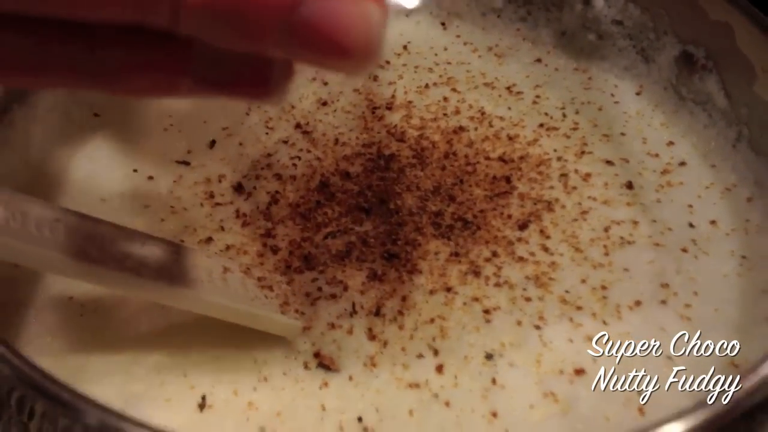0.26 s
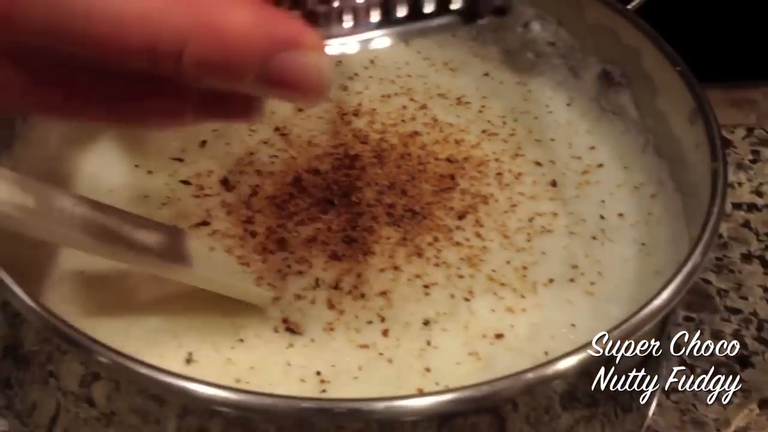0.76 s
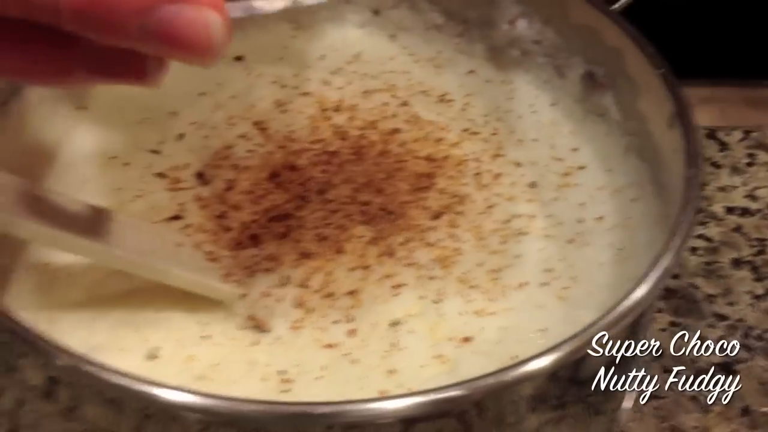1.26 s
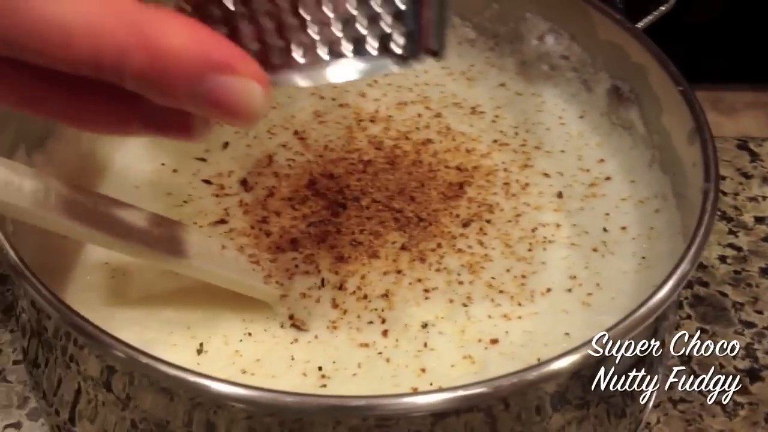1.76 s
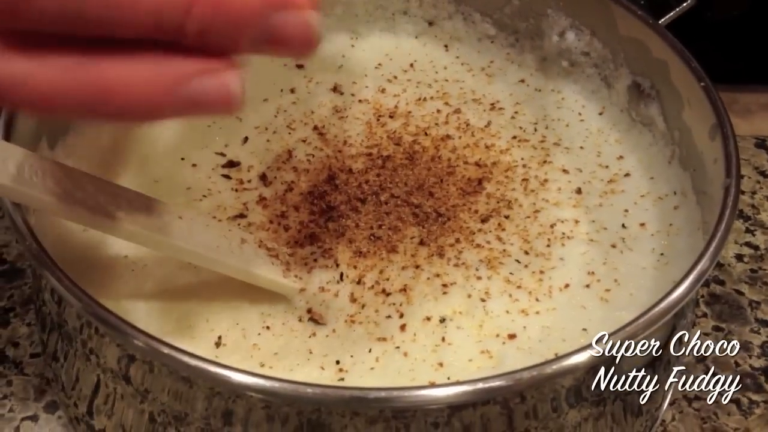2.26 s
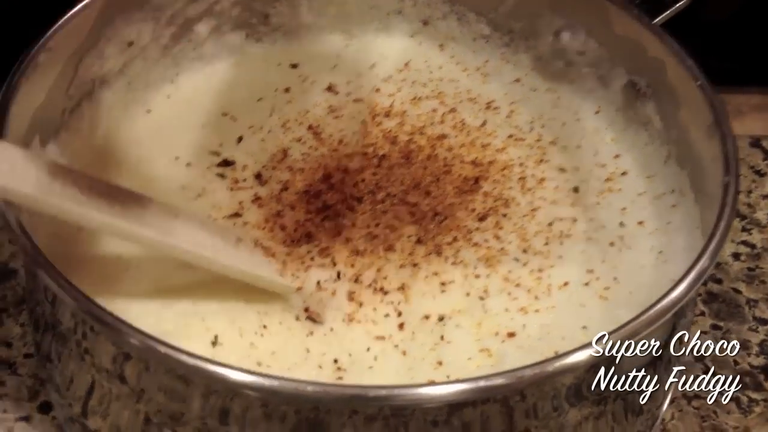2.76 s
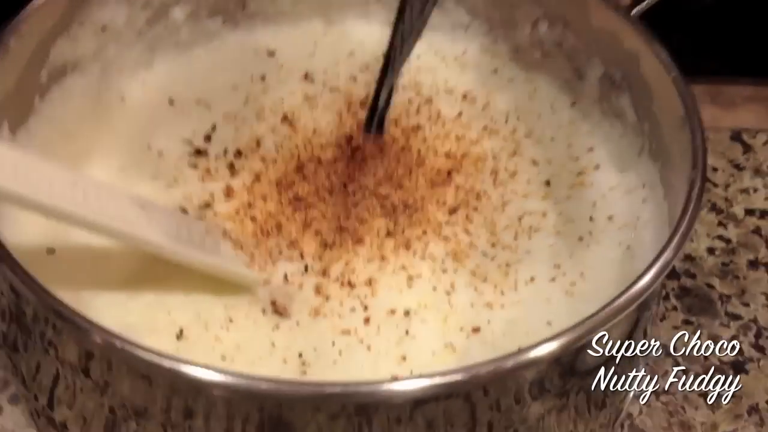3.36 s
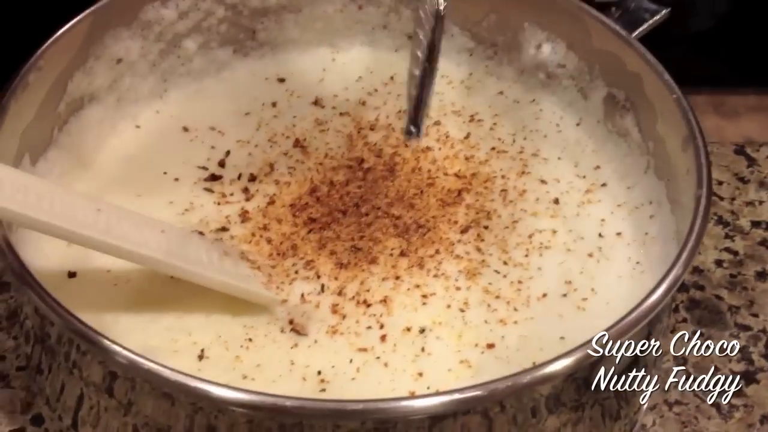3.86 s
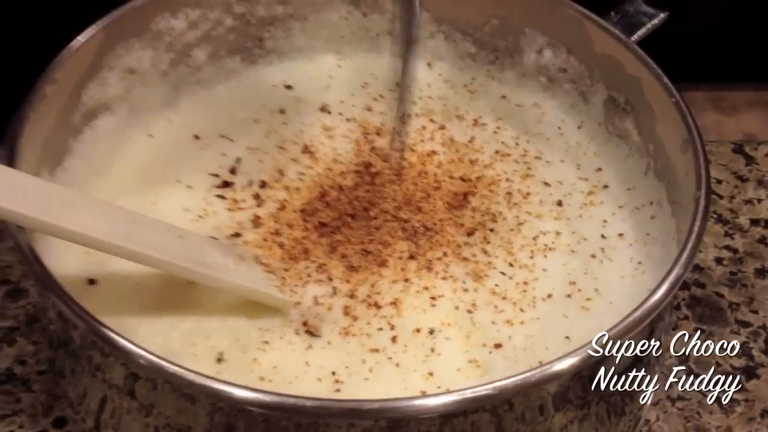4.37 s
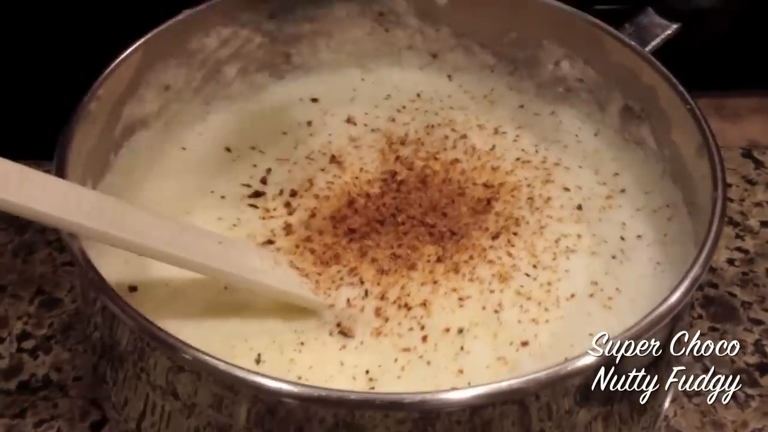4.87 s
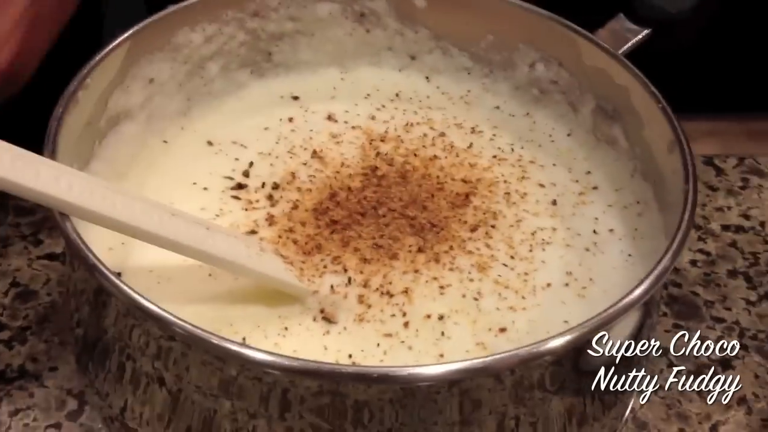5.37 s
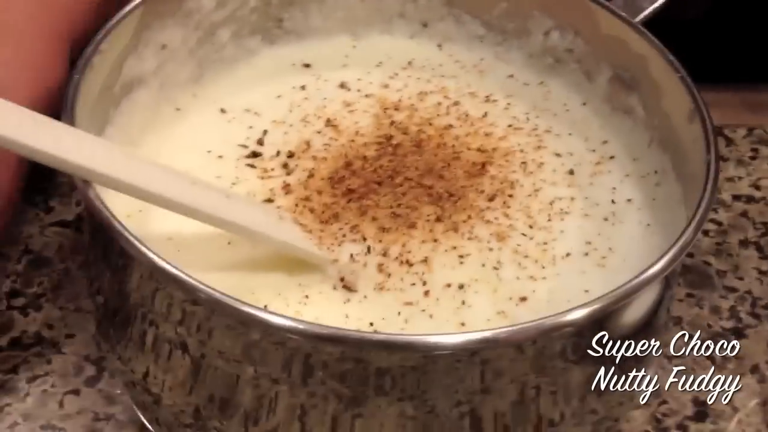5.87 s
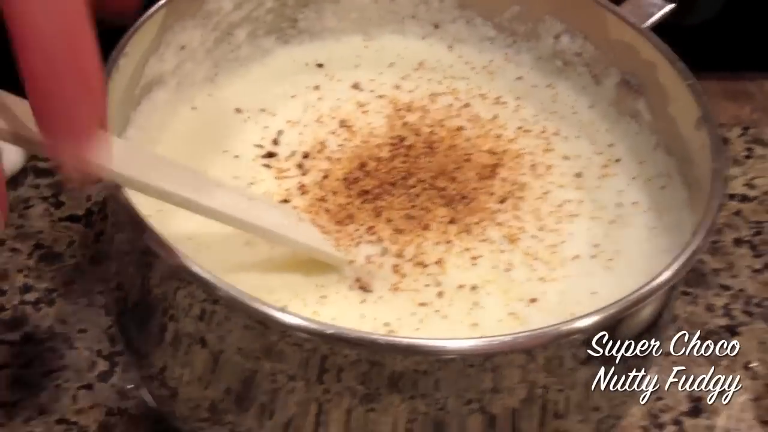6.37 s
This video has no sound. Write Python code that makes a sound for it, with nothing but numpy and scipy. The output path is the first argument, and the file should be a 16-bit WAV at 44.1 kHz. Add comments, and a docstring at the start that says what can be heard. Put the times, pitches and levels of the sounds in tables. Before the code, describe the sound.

Close up in a quiet, hard-walled kitchen, a hard nutmeg catches and scrapes on a small steel grater in quick irregular rasps. After a pause with soft rubbing, the grater is knocked six times against a hand, hollow and steady, with low ringing. It then lands on stone with a loud bright clatter and bouncing, followed by tiny ticks. Faint hiss and a low appliance drone continue beneath.

```python
"""In a quiet kitchen, over steady hiss and the far drone of an appliance, a nutmeg first catches and scrapes on a
small steel grater: bursts of coloured noise that excite its resonances, with soft rubbing now and later.
The grater is then knocked six times against the hand: damped modes, noise cracks and a low ringing.
Last it is laid on a stone counter, where it clatters and bounces: noise impacts with ringing steel modes.
Small ticks come before the knocks and at the end; the hard walls answer the hits with decaying noise."""
import sys
import numpy as np
from scipy import signal
from scipy.fft import rfft, irfft, next_fast_len
from scipy.io import wavfile
from scipy.ndimage import uniform_filter1d, map_coordinates

SR = 44100
rng = np.random.default_rng(int(sys.argv[2]) if len(sys.argv) > 2 else 0)


def write(x):
    x = np.atleast_2d(x).T
    wavfile.write(sys.argv[1], SR, np.round(np.clip(x, -1, 1) * 32767).astype(np.int16))


N = 291942

# Hiss spectrum. Each row: frequency in Hz, relative level in dB per Hz.
HISS = [(320, -36), (550, -19), (737, -10), (779, -2.5), (1040, -12.5), (1180, -11), (1980, -13),
        (2690, -14), (6190, -13.5), (9400, -19), (15300, -13.5)]
# Resonances of the far drone. Each row: centre in Hz, width in Hz, relative level in dB.
DRONE = [(125, 21, -8), (165, 7, 2.5), (202.2, 26, 6.5), (245, 11, -14), (291, 28, -2), (404, 200, -7.5),
         (448.5, 27, 1)]
HISS_DB, DRONE_DB = -69.5, -66  # rms levels
# Reverberation of the hard walls. Each row: frequency in Hz, T60 in seconds.
WALLS = [(150, 0.99), (700, 0.84), (2000, 0.49), (5000, 0.48), (14000, 0.15)]

# Small things tick and settle on the counter.
# Each row: start in seconds, level in dB, dull part in dB against it, tone in Hz.
TICK = [(3.1394, -53, 7, 420), (6.1928, -33, -5.5, 1630), (6.3021, -52, -20, 202), (6.3764, -50, 6, 202),
        (6.4744, -41, -9, 850), (6.549, -34.5, -18.5, 1780)]
TICK_RISE_S, TICK_T60_S, TICK_TONE_DB = 0.00079, 0.019, 4.5  # tone against the dull part

# Slow rubbing of nut, fingers and sleeve. Each row: start in seconds, swell in seconds, hold in seconds,
# release in seconds, level in dB, dull part in dB against it.
RUB = [(0.716, 0.063, 0.14, 0.091, -57.5, -22), (1.35, 0.025, 0.23, .04, -68.5, -9),
       (2.896, 0.097, .1, .1, -74.5, -13), (3.02, 0.32, 0.072, 0.28, -56, -8.5),
       (4.75, 0.23, 0.064, 0.28, -70, -8), (6.106, .3, 0.11, .05, -63, -5),
       (6.499, 0.048, .1, .05, -58.5, -11.5)]
RUB_DEPTH_DB = 19  # how far under its level a stroke starts and ends
RUB_WAVER_DB = 0.7  # unsteady pressure
# Bright spectrum of torn grit. Each row: frequency in Hz, relative level in dB per Hz.
RASP = [(1060, -20.5), (1800, -4.5), (3350, -3), (3630, -5.5), (4260, -2), (6000, -5.5), (8140, -2.5),
        (9830, -9), (12400, -4.5), (15400, -11)]
# Dull spectrum of the same contacts. Each row: frequency in Hz, relative level in dB per Hz.
DULL = [(150, -55.5), (250, -9), (399, -12.5), (497, -3.5), (664, -9), (956, -1.5), (1460, -8), (3000, -10),
        (3900, -34), (6600, -120)]

# Steel meets stone. Each row: start in seconds, level in dB, dull part in dB against it, dull tone in Hz,
# ring in dB against the level, favoured mode in Hz, T60 in seconds of the damping laid over the ring.
CLATTER = [(5.5111, -8, -21.5, 1726, -16.5, 5490, .07), (5.54, -22, -21.5, 1720, -8.5, 5490, .15),
           (5.633, -28, -20.5, 1380, -8, 5490, .08), (5.7797, -41, -6, 2000, 3, 2365, .12),
           (5.795, -31, -28, 1715, -13.5, 2365, .1), (5.799, -19, -34, 1660, -10, 2365, .1),
           (5.8015, -21.5, -35, 1660, 2.5, 11470, .06), (5.835, -12.5, -23.5, 681, 0, 8750, 0.03),
           (5.8504, -3, -14.5, 1550, -6, 6700, 0.052), (5.853, -5, -37, 1360, -14, 7700, 0.044),
           (5.8642, -8.5, -27, 659, -5, 14100, 0.087), (5.878, -12, -19, 1160, -17, 8700, .04),
           (5.884, -11, -23.5, 689, -13, 6700, .05), (5.911, -22.5, -16.5, 1480, -9, 8750, .04),
           (5.922, -30, -16, 664, -14, 5490, .11), (5.957, -30.5, -13, 1080, -7, 5460, .1)]
# The grater rocks on after a contact.
# Each row: start in seconds, length in seconds, first level in dB, dull tone in Hz, favoured mode in Hz.
ROCK = [(5.549, 0.045, -32.5, 750, 3580), (5.64, 0.036, -28.5, 800, 3540), (5.892, 0.083, -22.5, 700, 6700)]
ROCK_GAP_S, ROCK_SCATTER_DB, ROCK_FADE_DB = 0.0073, 2, 15.5  # spacing, unevenness, loss over one rocking
ROCK_DULL_DB, ROCK_RING_DB, ROCK_RING_T60_S = -16.5, -7.5, 0.08
# Modes of the steel. Each row: frequency in Hz, relative level in dB, T60 in seconds before added damping.
STEEL = [(2460, 5.5, .3), (3570, 1, 0.26), (4600, -12, 0.078), (5600, 3.5, 0.35), (6700, -0.5, 0.16),
         (7240, -11, .1), (7960, -5, .1), (7700, -7, 0.13), (8600, 7, .1), (9400, -9.5, .15),
         (10100, -15, 0.071), (11040, -3.5, 0.15), (12190, -15, .1), (12890, -13, .12), (13300, -6, .1),
         (14100, -8, .1), (14600, -13, .12)]
# Bright crack on the stone. Each row: frequency in Hz, relative level in dB per Hz.
STONE = [(1060, -48.5), (1800, -5), (2490, -6), (3630, -3), (4330, -9.5), (4930, 3.5), (6150, 1),
         (6680, 3.5), (8730, 1.5), (10000, -6), (14100, 3.5), (15500, -12), (16400, -47.5)]
# Dull answer of the counter. Each row: frequency in Hz, relative level in dB per Hz.
BASE = [(150, -39), (250, -10), (574, -4.5), (678, 2.5), (844, -9), (1050, 1), (1330, -1.5), (3000, -3.5),
        (3900, -46), (6600, -120)]
CRACK_T60_S = 0.023  # bright crack on the stone

# Grater against the hand. Each row: start in seconds, level in dB, thud in dB against it,
# crack in dB against it, tightness as the tilt of the slap in dB per octave.
KNOCK = [(3.704, -10.5, -12, -12.5, 0.8), (3.882, -14.5, -15.5, -15, -0.5), (4.059, -9.5, -14.5, -11, -5.5),
         (4.235, -8, -13.5, -12, -2), (4.403, -8.5, -16.5, -12.5, 1.5), (4.573, -10, -15, -10, 5.5)]
# Modes of the grater damped by the palm.
# Each row: frequency in Hz, relative level in dB before the tilt, T60 in seconds before the overall fade.
SLAP = [(473, -16.5, 0.027), (878, -2, 0.041), (1075, 6, 0.03), (1191, -4, 0.049), (1405, 8.5, 0.018),
        (1744, -6.5, 0.048), (2004, -1.5, 0.022), (2300, -10.5, 0.019)]
# Modes that ring on in pot and counter.
# Each row: frequency in Hz, relative level in dB, T60 in seconds before the overall fade.
BOOM = [(129, -9, 0.52), (177.5, -2, 0.41), (204.2, 2.5, 0.32), (236.4, -5.5, 0.4), (289.5, 0.5, 0.13),
        (318.3, -11, 0.53), (458, 4.5, 0.067), (804, -2.5, 0.25), (924, -3, 0.099), (863, 3.5, 0.27),
        (1119, -7.5, 0.5), (1167, -19, .27), (1210, -11.5, 0.22), (1397.4, -12.5, 0.28), (1470, -7, 0.18)]
# Crack of a knock. Each row: frequency in Hz, relative level in dB per Hz.
CRACK = [(1180, -23.5), (2000, -24.5), (2890, -12), (4380, -10), (7750, -10.5), (9920, -23.5), (13100, -17),
         (15000, -28.5), (16400, -67.5)]
# Dense blur of weaker modes. Each row: frequency in Hz, relative level in dB per Hz.
WASH = [(150, -21.5), (250, -8.5), (329, -14.5), (352, -9.5), (454, -11), (536, -16.5), (890, -0.5),
        (1400, -5.5), (1510, -24), (1840, -13), (2780, -29), (3500, -32), (4550, -54), (7700, -120)]

# The nut catches on one tooth.
# Each row: start in seconds, level in dB, dull part in dB against it, tone in Hz.
CATCH = [(0.0014, -21.5, -9, 1240), (0.1407, -28.5, -3.5, 1160), (0.154, -23, -4.5, 2030),
         (0.1742, -24.5, -12, 1050), (0.306, -26.5, -5.5, 2510), (0.5343, -20, -12, 1850),
         (0.563, -23.5, -10, 3260), (0.578, -30, -17, 3040), (0.8513, -42, -12, 470),
         (0.8757, -33.5, -11, 1440), (0.8958, -31, -14, 1760), (0.9236, -35.5, -15, 1770),
         (1.0171, -43, -19, 500), (1.0272, -40.5, -4, 980), (1.05, -34.5, -5, 2320),
         (1.063, -27.5, -10, 3330), (1.072, -26.5, -10.5, 1310), (1.1068, -31.5, -5, 1440),
         (1.1168, -33.5, -5, 940), (1.179, -25, -15, 3000), (1.1907, -27.5, -7.5, 940),
         (1.202, -20.5, -10.5, 940), (1.2292, -25.5, -14, 3020), (1.3365, -35, -8, 1870),
         (1.3489, -29, -5.5, 888), (1.619, -36.5, -1.5, 1010), (1.6221, -21, -12, 3510),
         (1.8002, -42, -4, 2420), (1.8193, -35, -7, 523), (1.8284, -21.5, -9, 3350),
         (2.0298, -42.5, -22, 2900), (2.1337, -49, -14, 467), (2.2378, -29, -19, 2150),
         (2.2553, -30, -16, 3230)]
CATCH_RISE_S, CATCH_T60_S, CATCH_TONE_DB = 0.0013, 0.025, -0.5  # tone against the dull part
# The nut drags over a row of teeth. Each row: start in seconds, length in seconds, first level in dB,
# dull part in dB against it, tone in Hz.
DRAG = [(0.009, 0.019, -36, -8, 2450), (0.166, 0.01, -35, -4, 1000), (0.179, 0.023, -28.5, -9, 1010),
        (0.544, 0.046, -30, -13, 520), (0.774, 0.044, -51, -12, 497), (1.031, 0.015, -44, -13, 960),
        (1.071, 0.017, -37, -6, 1340), (1.213, 0.016, -42, -4.5, 2200), (1.63, 0.009, -33, -22, 980),
        (1.835, 0.045, -26.5, -14.5, 523), (2.036, .012, -47.5, -17, 2920),
        (2.242, 0.046, -32.5, -13.5, 2080)]
TOOTH_S, TOOTH_SCATTER_DB, DRAG_FADE_DB = 0.005, 1, 10.5  # tooth spacing, uneven bite, loss over one drag
# Resonances of the grater. Each row: centre in Hz, width in Hz, relative level in dB.
GRATER = [(489, 29, -10), (1070, 105, 2), (2037, 8, 0.5), (2690, 430, 3), (3310, 12, 2.5), (3970, 9.4, 0),
          (4560, 21, -1), (5260, 100, -18), (5380, 80, -10), (7680, 220, -8), (8800, 50, -8),
          (8830, 36, -8)]

# Response of the microphone. Each row: frequency in Hz, gain in dB.
MIC = [(20, -32), (70, -6), (115, 0.5), (15200, 1), (15600, -14.5), (16500, -27.5)]
TOP_HZ = 16521  # band limit
CEILING, KNEE = 0.62, 4  # the input stage rounds off peaks: amplitude limit, sharpness of the bend


def amp(db):
    """Level to amplitude ratio: 20 dB for each factor of ten."""
    return 10 ** (np.asarray(db) / 20)


def unit(x):
    """Normalisation to an rms of 1."""
    return x / np.sqrt(np.mean(x ** 2) + 1e-20)


def along(points, hz):
    """Linear interpolation of (Hz, value) points over logarithmic frequency."""
    f, v = np.transpose(points)
    return np.interp(np.log(hz + 1), np.log(f + 1), v)


def filtered(x, response):
    """Linear filtering: the spectrum is multiplied by a response of frequency."""
    m = next_fast_len(N + SR // 2)
    return irfft(rfft(x, m) * response(np.fft.rfftfreq(m, 1 / SR)), m)[:N]


def resonance(hz, centre, width):
    """Driven damped oscillator: a complex band-pass response with unit gain at its centre."""
    return 1j * hz * width / (centre * centre - hz * hz + 1j * hz * width)


def grit(spectrum, spiky_db):
    """Granular noise: many tiny impacts of scattered size, coloured by a spectrum, with an rms of 1."""
    size = amp(spiky_db * rng.standard_normal(N // 16 + 1)).repeat(16)[:N]
    impacts = size * rng.standard_normal(N)
    return unit(filtered(impacts, lambda hz: amp(along(spectrum, hz))))


def add(track, s, sound):
    """Superposition: a sound is summed into the track from s seconds on."""
    part = track[round(s * SR):][:len(sound)]
    part += sound[:len(part)]


def fade(t, rise, t60):
    """Transient envelope: a quick exponential rise and an exponential decay."""
    return (1 - np.exp(-t / max(rise, 1e-4))) * amp(-60 * t / max(t60, 2e-3))


def ring(modes, t, scatter_db, loose):
    """Modal superposition: decaying sines of fresh strengths, their phases scattered over loose cycles."""
    hz, db, t60 = np.transpose(modes)[:, :, None]
    luck = rng.standard_normal(hz.shape)
    phase = loose * rng.random(hz.shape)
    strength = amp(db + scatter_db * luck - 60 * t / t60)
    return np.sum(strength * np.sin(2 * np.pi * (hz * t + phase)), axis=0)


def train(start, length, db, gap, scatter_db, fade_db):
    """Repeated contact: uneven (seconds, dB) events about a gap apart that weaken along the way."""
    luck = rng.standard_normal((16, 2))
    jitter = 0.3 * np.clip(luck[:, 0], -1.5, 1.5)
    after = gap * (np.arange(len(luck)) + jitter).clip(0)
    return [(start + a, db - fade_db * a / length + scatter_db * bite)
            for a, bite in zip(after, luck[:, 1]) if a < length]


def bursts(rows, rise, t60, tone_db):
    """Impact excitation: bright rasp, dull body and the tone of the touched spot share each contact."""
    bright, dull, tone = np.zeros((3, N))
    t = np.arange(SR // 4) / SR
    for s, db, dull_db, hz in rows:
        add(bright, s, amp(db - 7.0) * fade(t, rise, t60))
        add(dull, s, amp(db + dull_db - 3.5) * fade(t, rise, t60))
        sine = np.sin(2 * np.pi * hz * t)
        add(tone, s, amp(db + dull_db + tone_db) * fade(t, rise, 0.82 * t60) * sine)
    return bright * grit(RASP, spiky_db=3.0) + dull * grit(DULL, spiky_db=3) + tone


def kitchen():
    """Stationary noise: steady hiss, and a drone gathered in a few low resonances."""
    def bands(hz):
        return np.sqrt(sum((amp(db) * np.abs(resonance(hz, c, w))) ** 2 for c, w, db in DRONE))

    drone = unit(filtered(rng.standard_normal(N), bands))
    return amp(HISS_DB) * grit(HISS, spiky_db=-1.5) + amp(DRONE_DB) * drone


def walls(x, size=1):
    """Diffuse reverberation: after a short delay the power in each band dies at its own speed."""
    delayed = np.pad(x, (350, 0))[:N]  # samples
    hz, t, (source, noise) = signal.stft([delayed, rng.standard_normal(N)], SR, nperseg=384)
    dying = amp(-120 * t[:150] / along(WALLS, hz)[:, None])  # power, so 120 here is a loss of 60 dB
    # power is evened out over neighbouring bands
    power = uniform_filter1d(np.abs(source) ** 2, size, axis=0)
    power = signal.fftconvolve(power, dying / dying.sum(1, keepdims=True), axes=1)[:, :len(t)]
    carrier = noise / np.sqrt(np.mean(np.abs(noise) ** 2))
    return signal.istft(carrier * np.sqrt(np.abs(power)), SR, nperseg=384)[1][:N]


def ticking():
    """Light impacts: small things settle on the counter in short bursts of noise and tone."""
    return bursts(TICK, TICK_RISE_S, TICK_T60_S, TICK_TONE_DB)


def rubbing():
    """Sliding friction: light strokes of finer grit swell, hold and let go."""
    bright, dull, t = np.zeros(N), np.zeros(N), np.arange(N) / SR
    for s, swell, hold, release, db, dull_db in RUB:
        corners = s + np.cumsum([0, swell, hold, release])
        shape_db = np.interp(t, corners, [-RUB_DEPTH_DB, 0, 0, -RUB_DEPTH_DB], -80, -80)
        stroke = amp(db + shape_db)
        bright += stroke
        dull += amp(dull_db) * stroke
    # smooth random curve through 25 points a second
    waver = amp(RUB_WAVER_DB * map_coordinates(rng.standard_normal(300), [25 * t]))
    return waver * (bright * grit(RASP, spiky_db=0.5) + dull * grit(DULL, spiky_db=3.0))


def clatter():
    """Impact and modal ringing: stone contacts crack, thump and ring the steel until it is damped again."""
    bright, dull, steel, boom = np.zeros((4, N))
    t = np.arange(SR // 2) / SR
    # the heavy stone favours the deepest modes
    low = [(hz, level - 8 * np.log2(hz / 130), life) for hz, level, life in BOOM[:3]]
    rocking = [(s, db, ROCK_DULL_DB, dull_hz, ROCK_RING_DB, mode_hz, ROCK_RING_T60_S)
               for start, length, top_db, dull_hz, mode_hz in ROCK
               for s, db in train(start, length, top_db, ROCK_GAP_S, ROCK_SCATTER_DB, ROCK_FADE_DB)]
    for s, db, dull_db, dull_hz, ring_db, mode_hz, ring_t60 in CLATTER + rocking:
        add(bright, s, amp(db - 7.5) * fade(t, 0.00054, CRACK_T60_S))
        add(dull, s, amp(db + dull_db - 4.5) * fade(t, 0.00083, 2.1 * CRACK_T60_S))
        tone = np.sin(2 * np.pi * dull_hz * t)
        add(steel, s, amp(db + dull_db + 0.5) * fade(t, 0.00086, 1.5 * CRACK_T60_S) * tone)
        # the spot that is struck favours the modes near one pitch
        modes = [(hz, level - 14 * abs(np.log2(hz / mode_hz)), life) for hz, level, life in STEEL]
        ringing = ring(modes, t, scatter_db=1.5, loose=1.0)
        add(steel, s, amp(db + ring_db - 12) * fade(t, 0.00062, ring_t60) * ringing)
        rumble = ring(low, t, scatter_db=7.5, loose=1.0)
        add(boom, s, amp(db + dull_db - 23) * fade(t, 0.012, 1.8) * rumble)
    hits = bright * grit(STONE, spiky_db=2.2) + dull * grit(BASE, spiky_db=5) + steel
    return hits + boom + amp(-11) * walls(hits, size=3)


def knocks():
    """Damped modal impact: a slap of a few cycles and a crack, after which modes and their blur ring on."""
    slap, boom, crack, wash = np.zeros((4, N))
    t = np.arange(SR // 2) / SR
    low = [mode for mode in BOOM if mode[0] < 500]
    middle = [mode for mode in BOOM if mode[0] >= 500]
    for s, db, thud_db, crack_db, tilt_db in KNOCK:
        modes = [(hz, level + tilt_db * np.log2(hz / 1000), life) for hz, level, life in SLAP]
        struck = ring(modes, t, scatter_db=3.0, loose=0.14)
        add(slap, s, amp(db - 4.5) * fade(t, 0.00098, 0.61) * struck)
        # the weight of the blow sets the low modes
        deep = ring(low, t, scatter_db=2.5, loose=0.82)
        add(boom, s, amp(db + thud_db - 5.5) * fade(t, 0.006, 2.7) * deep)
        higher = ring(middle, t, scatter_db=-4.0, loose=0.94)
        add(boom, s, amp(db - 25.5) * fade(t, 0.0026, 2.7) * higher)
        add(wash, s, amp(db - 17.5) * fade(t, 0.0004, 0.38))
        add(crack, s, amp(db + crack_db - 2.0) * fade(t, 0.00024, 0.031))
    crack *= grit(CRACK, spiky_db=-1.5)
    direct = slap + boom + wash * grit(WASH, spiky_db=2.0) + crack
    return direct + amp(-12.5) * walls(crack, size=9) + amp(-15.5) * walls(slap)


def grating():
    """Source and resonator: each catch tears grit off the nut and shakes the resonances of the grater."""
    teeth = [(s, db, dull_db, hz) for start, length, top_db, dull_db, hz in DRAG
             for s, db in train(start, length, top_db, TOOTH_S, TOOTH_SCATTER_DB, DRAG_FADE_DB)]
    tears = bursts(CATCH + teeth, CATCH_RISE_S, CATCH_T60_S, CATCH_TONE_DB)

    def body(hz):  # neighbouring resonances alternate in sign
        return sum((-1) ** k * amp(db) * resonance(hz, c, w) for k, (c, w, db) in enumerate(GRATER))

    return tears + amp(3.0) * filtered(tears, body)


def scene():
    """Superposition of all sources, with the walls answering grating and ticks here."""
    small = grating() + ticking()
    return (small + amp(-13) * walls(small) + rubbing() + knocks() + clatter() + kitchen())[None]


def record(dry):
    """Saturation and band limiting: peaks are rounded off, then deep bass and top treble are dropped."""
    soft = dry[0] / (1 + np.abs(dry[0] / CEILING) ** KNEE) ** (1 / KNEE)
    return filtered(soft, lambda hz: (hz < TOP_HZ) * amp(along(MIC, hz)))[None]


dry = scene()
out = record(dry)
write(out)
```